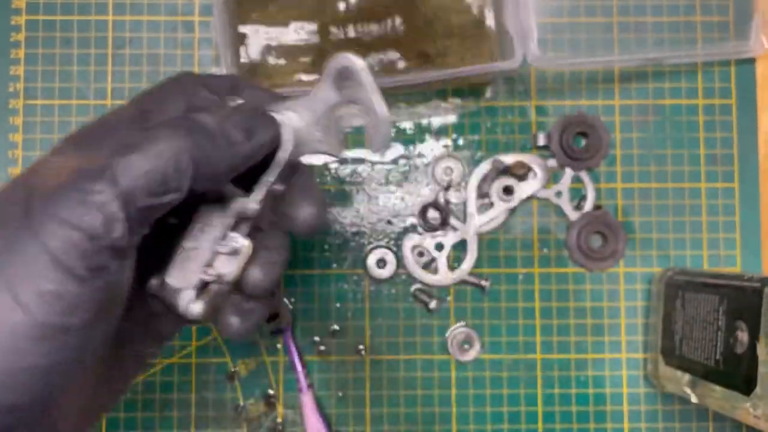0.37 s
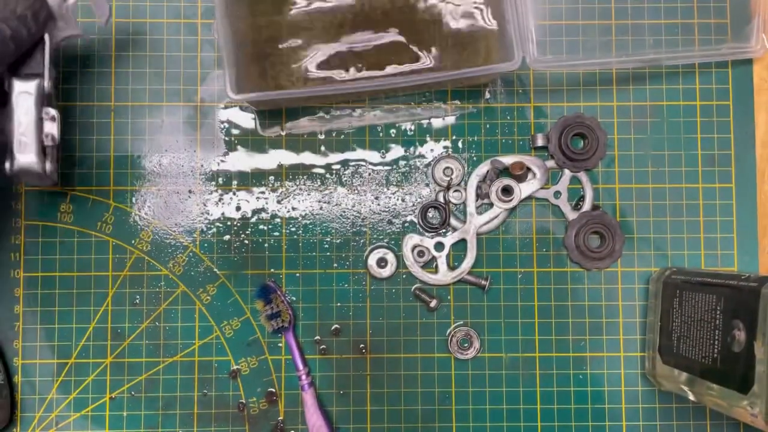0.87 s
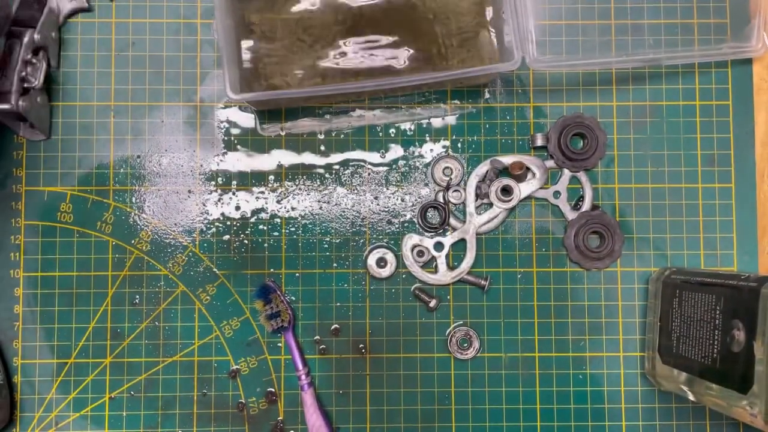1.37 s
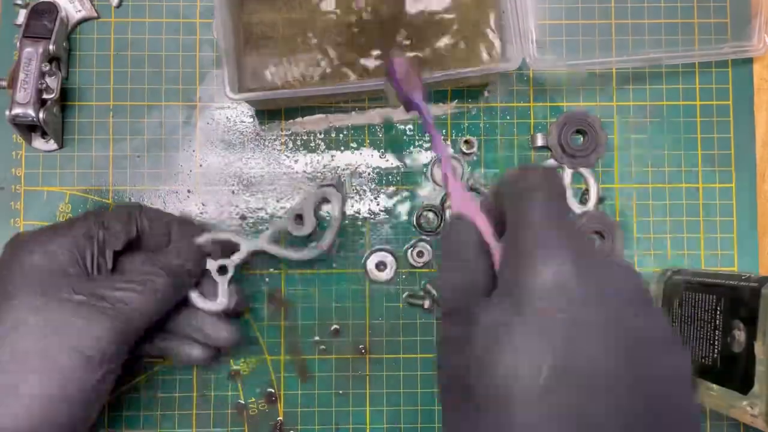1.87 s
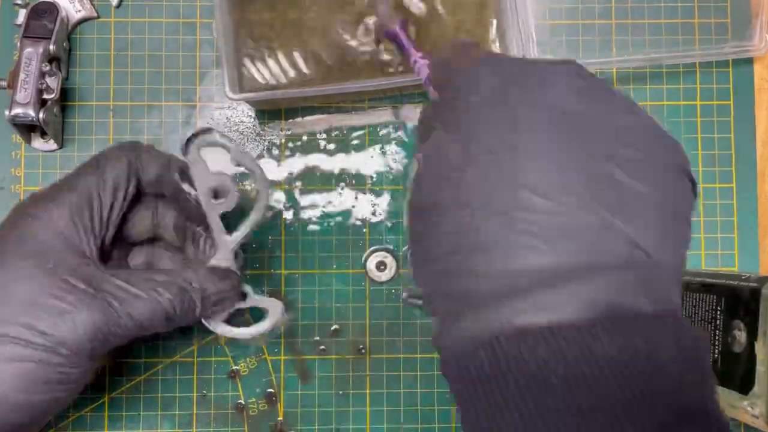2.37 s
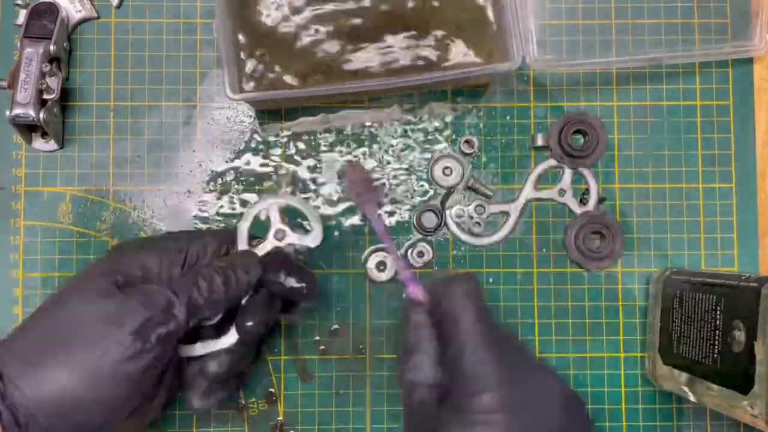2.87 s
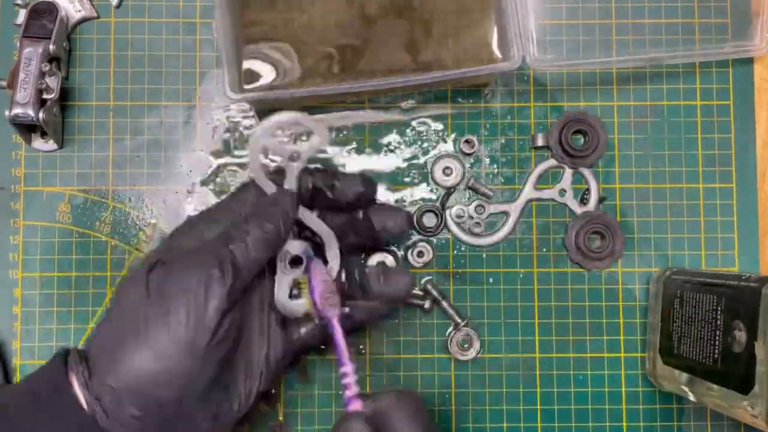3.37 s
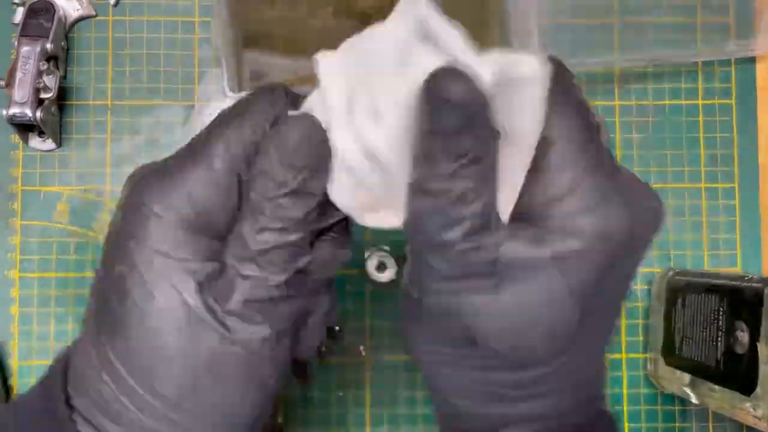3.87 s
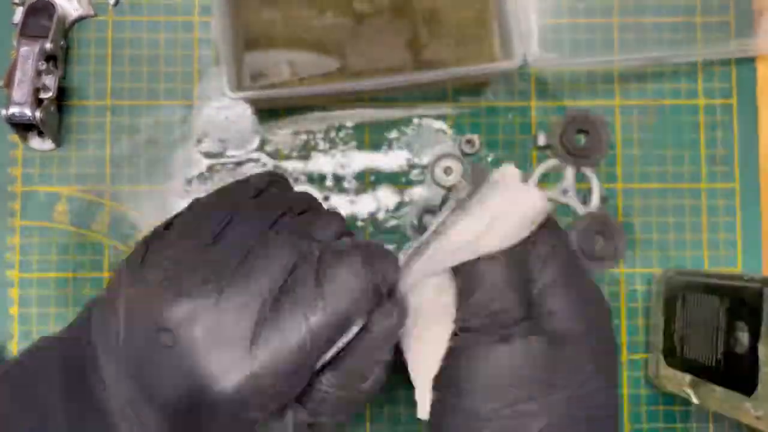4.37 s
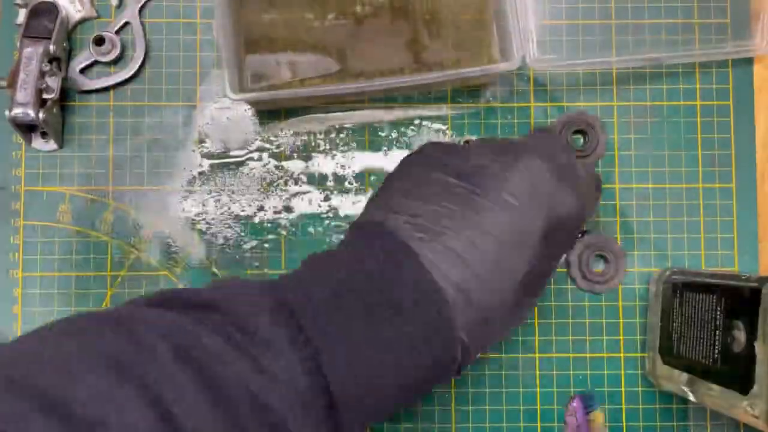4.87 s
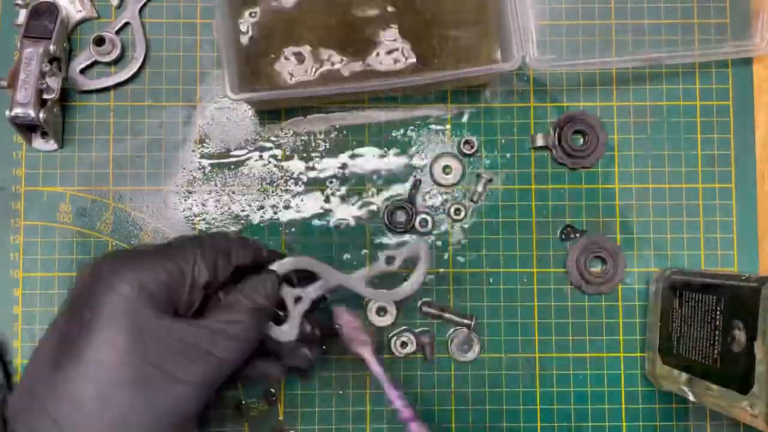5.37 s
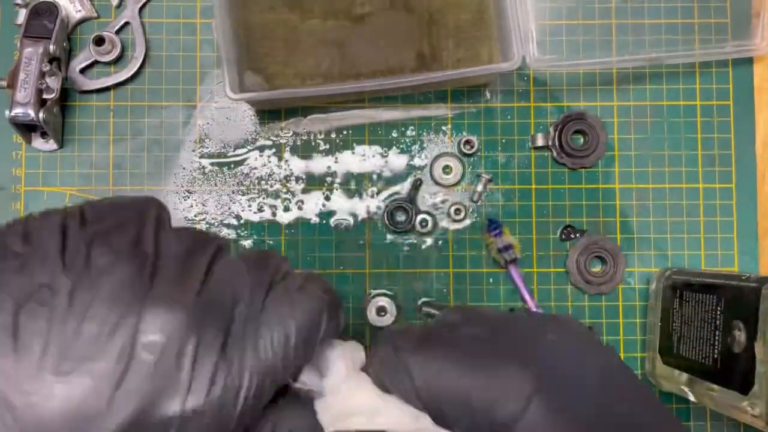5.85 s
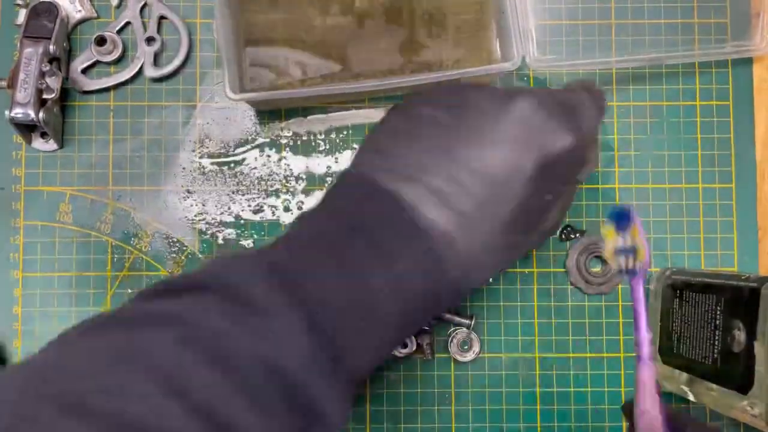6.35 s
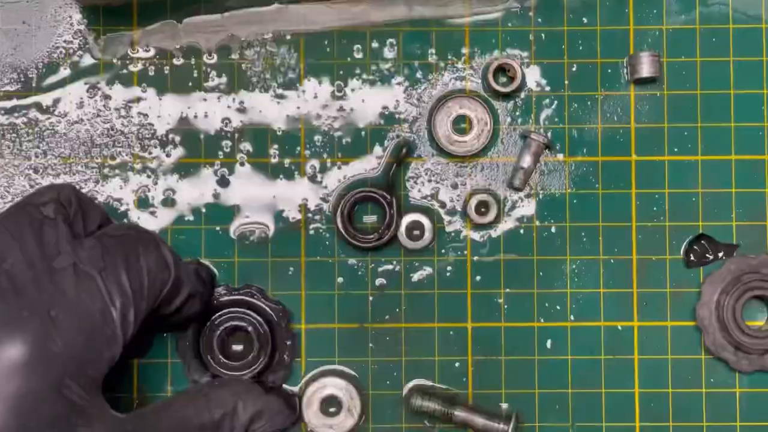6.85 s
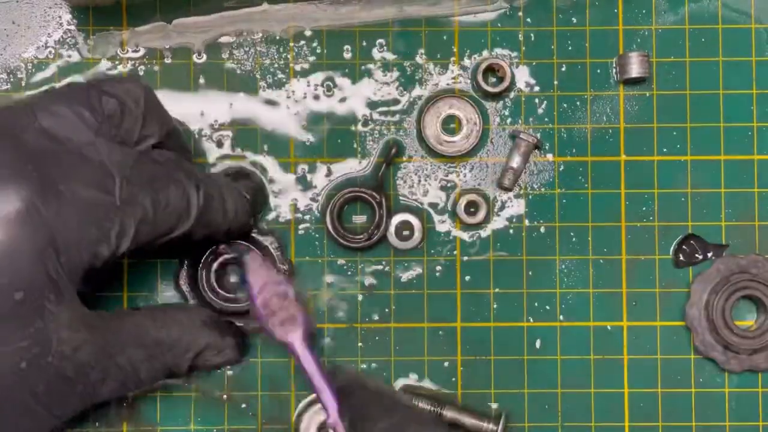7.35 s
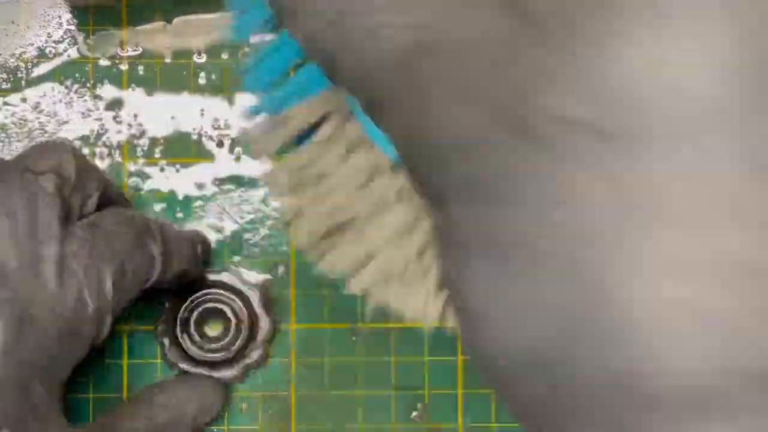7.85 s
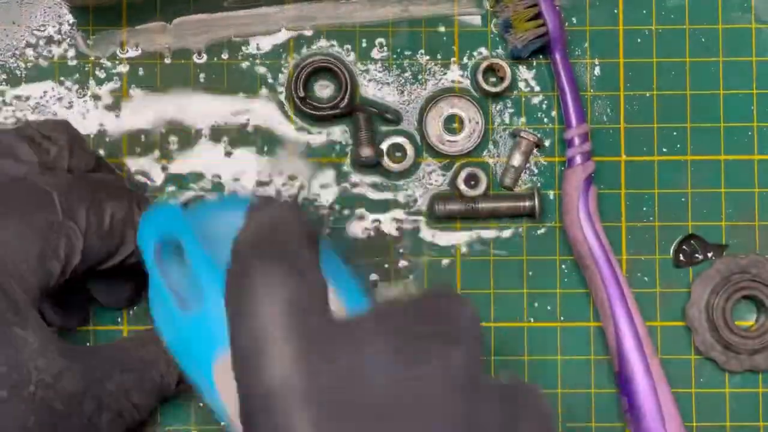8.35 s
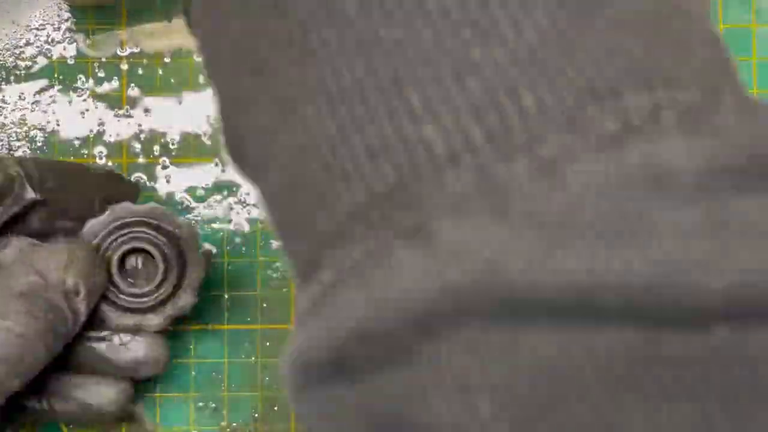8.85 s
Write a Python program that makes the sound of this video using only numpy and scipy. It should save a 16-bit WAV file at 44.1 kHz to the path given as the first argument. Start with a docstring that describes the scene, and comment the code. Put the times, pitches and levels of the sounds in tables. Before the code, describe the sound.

At natural speed, a squirt of liquid hisses sharply and stops, leaving low quiet rumble until a part knocks the bench several times. After a tiny silent gap, fast-motion cleaning follows: light brushing, soft cloth wiping, gritty ticks and hard small-part clicks, each knocking the bench woodenly. A faint engine note glides past about midway. Miked close, fairly dry, with thin airy room murmur and the strongest rasping last.

```python
"""Gloved hands clean small metal parts on a work bench; brush, cloth and scrubber strokes are lumpy noise.
First, at natural speed, a spray trigger clicks and its jet squirts sputtering hiss; then a part meets the
bench with clicks, thumps and a dull room wash. Then comes fast motion, high and short: strokes whose lumps
also shake the bench, ticks, and clacking parts made of noise snaps and ringing modes. Rumble fills the room,
as a murmur with a faint engine note and hum in fast motion; one short silent splice interrupts the sound."""
import sys
import numpy as np
from scipy import signal
from scipy.fft import rfft, irfft, next_fast_len
from scipy.io import wavfile
from scipy.ndimage import uniform_filter1d, map_coordinates

SR = 44100
rng = np.random.default_rng(int(sys.argv[2]) if len(sys.argv) > 2 else 0)


def generate_wav(signal):
    """Clip the signal to [-1, 1] and save it as 16-bit WAV at the path in sys.argv[1]."""
    frames = np.transpose(np.atleast_2d(signal))
    scaled = np.clip(frames, -1, 1) * 32767
    pcm = np.round(scaled).astype(np.int16)
    wavfile.write(sys.argv[1], SR, pcm)


def elevation(decibels):
    """Turn decibel levels (scalar or array-like) into linear amplitude ratios."""
    levels = np.asarray(decibels, float)
    return 10 ** (levels / 20)


N = 396018
TIME = np.arange(N) / SR
FAST = 8  # how many times faster the fast motion runs
FAST_START_S = 1.606
SPLICE_START_S, SPLICE_END_S = 1.897, 1.974


def unit(x):
    """Scale a sound to an rms of 1."""
    return x / np.sqrt(np.mean(x ** 2) + 1e-20)


def noise():
    """White noise for the whole scene."""
    return rng.standard_normal(N)


def along(points, hz):
    """Read a curve of (pitch [Hz], value) points, with pitch on a log scale."""
    point_hz, value = np.transpose(points)
    return np.interp(np.log(hz + 1), np.log(point_hz + 1), value)


def wobble(rate):
    """A smooth random curve with this many random points a second."""
    points = rng.standard_normal(int(N * rate / SR) + 4)
    return map_coordinates(points, [TIME * rate])


def coloured(x, spectrum):
    """Make each pitch louder or softer by a (pitch [Hz], level [dB]) curve."""
    size = next_fast_len(len(x) + 8192)
    gain = elevation(along(spectrum, np.fft.rfftfreq(size, 1 / SR)))
    return irfft(rfft(x, size) * gain, size)[:len(x)]


def patchy(x, depth_db):
    """Give a sound random louder and softer patches, about 1 kHz by 20 ms, at rms 1."""
    z = signal.stft(x, nperseg=256)[2]
    field = uniform_filter1d(rng.standard_normal(z.shape), size=6, axis=0)
    field = uniform_filter1d(field, size=7, axis=1)
    patched = signal.istft(z * elevation(depth_db * unit(field)), nperseg=256)[1]
    return unit(patched[:N])


def held(start, length, db, rise_s, fall_db_per_s, sag_db_per_s=0):
    """Gain of one gesture: a short rise, a hold that may sag, a fall at a steady dB rate."""
    t = TIME - start
    sag_db = sag_db_per_s * np.clip(t, 0, length)
    fall_db = fall_db_per_s * np.clip(t - length, 0, 1)
    return np.clip(t / max(rise_s, 1e-4), 0, 1) * elevation(db - sag_db - fall_db)


def ring(modes, speed, near_hz=None, focus_db=0):
    """One blow on a set of modes, peak 1; the spot struck favours the modes near one pitch."""
    t = np.arange(int(SR * .7 / speed)) / SR * speed
    hz, db, t60 = np.transpose(modes * 2)[:, :, None]
    hz = hz * (1 + .015 * rng.standard_normal(hz.shape))  # every mode is a close, beating pair
    db = db + rng.normal(0, 2.5, hz.shape)
    if near_hz:
        octaves_away = np.abs(np.log2(hz * speed / near_hz))
        db = db - np.minimum(focus_db * octaves_away, 18)
    # each mode needs about a cycle to swing up, so the thump seems to fall in pitch
    rise = 1 - np.exp(-t * hz / 0.73)
    phase = np.tile(rng.uniform(0, 2 * np.pi, (len(modes), 1)), (2, 1))
    swing = np.sin(2 * np.pi * hz * t + phase)
    x = (rise * elevation(db - 60 * t / t60) * swing).sum(0)
    return x / np.abs(x).max()


def crack(spectrum, t60):
    """A broadband snap of peak 1 with a short noisy tail."""
    t = np.arange(SR // 8) / SR
    snap = elevation(-60 * t / 0.0036)
    tail = 0.29 * elevation(-60 * t / max(t60, .005))
    x = rng.standard_normal(len(t)) * (snap + tail)
    x = coloured(np.pad(x, (32, 0)), spectrum)[32:]
    return x / np.abs(x).max()


def add(track, s, x):
    """Mix a sound into the track from time s."""
    part = track[round(s * SR):][:len(x)]
    part += x[:len(part)]


def stereo(x, width):
    """Two close ports: the side signal is the sound with phases that drift as the hands move."""
    z = signal.stft(x, nperseg=128)[2]
    drift = uniform_filter1d(rng.standard_normal((2, *z.shape)), size=60, axis=2)
    turn = (drift[0] + 1j * drift[1]) / np.hypot(*drift)
    side = signal.istft(z * turn, nperseg=128)[1][:N]
    side = coloured(side * np.std(x) / np.std(side), width)
    return np.array([x + side, x - side])


# tone colour of the quiet room: (pitch [Hz], relative level [dB])
SLOW_ROOM_TONE = [(20, -33), (45, -3), (65, 3.5), (85, -12.5), (165, -15), (300, -20), (500, -30),
                  (3500, -32), (8500, -44.5), (11000, -15), (16000, -39)]


def slow_room():
    """The quiet room at natural speed: steady noise, strongest in the low rumble."""
    return elevation(-80) * unit(coloured(noise(), SLOW_ROOM_TONE))


# tone colour of the room in fast motion: (pitch [Hz], relative level [dB])
FAST_ROOM_TONE = [(100, -49), (400, -10), (555, 3.5), (680, -0.5), (780, 0), (860, -10.5), (1100, -6),
                  (1350, -11), (2000, -19.5), (6000, -29), (16000, -65.5)]


def fast_room():
    """The room rumble lifted to a wavering mid-range murmur of air, quieter before the splice."""
    level_db = np.where(TIME < SPLICE_START_S, -61, -59) + 1.93 * wobble(20)
    return elevation(level_db) * unit(coloured(noise(), FAST_ROOM_TONE))


def tone(pitch_hz):
    """A pure tone of rms 1 that follows a changing pitch."""
    return np.sqrt(2) * np.sin(2 * np.pi * np.cumsum(pitch_hz) / SR)


def hum():
    """A thin hum in fast motion: one tone that wavers slightly in pitch and level."""
    return elevation(-82.5 + 2.9 * wobble(9.1)) * tone(1700 + 5 * wobble(18))


# path of a distant engine, raised by the fast motion: (time [s], pitch [Hz], level [dB])
ENGINE_PATH = [(4.3, 550, -69), (4.53, 578.3, -63), (4.68, 549, -53.5), (4.88, 494.9, -67.5),
               (5.05, 535, -54), (5.17, 589, -60.5), (5.35, 622, -65), (5.55, 635, -69)]


def engine():
    """A distant engine note: a tone gliding along its path, with small random wavering."""
    s, hz, db = np.transpose(ENGINE_PATH)
    pitch_hz = np.interp(TIME, s, hz) + 6 * wobble(25)
    level_db = np.interp(TIME, s, db) + 2.6 * wobble(22)
    return elevation(level_db) * tone(pitch_hz)


# heavy contacts that shove the whole bench: (time [s], level [dB])
BENCH_SHOVES = [(4.708, -65), (6.223, -58)]


def shoves():
    """Each heavy contact gives one smooth low push to the bench."""
    width_s = .0015
    return sum(elevation(db) * np.exp(-((TIME - s) / width_s) ** 2) for s, db in BENCH_SHOVES)


# washes of room sound around the set-down contacts: (start time [s], length [s], level [dB])
ROOM_WASHES = [(0.403, 0.34, -79), (1.076, .025, -61), (1.111, 0.0279, -61.5), (1.32, 0.0147, -66)]
# tone colour of the room wash: (pitch [Hz], relative level per Hz [dB])
ROOM_WASH_TONE = [(300, -16), (1200, -4.5), (3500, -1.5), (6500, -8), (9000, -21), (11500, -10),
                  (16000, -31)]


def room_wash():
    """The room's dull wash of patchy noise, dying away after each set-down contact it follows."""
    gains = [held(*row, rise_s=0.0092, fall_db_per_s=140) for row in ROOM_WASHES]
    return np.max(gains, axis=0) * patchy(coloured(noise(), ROOM_WASH_TONE), depth_db=3.0)


def spray_flow():
    """The squeezed trigger dribbles, the jet opens, weakens and shuts, and the room rings on."""
    squeeze_s, jet_s, jet_length_s = .031, 0.054, 0.098
    swell_db = 519.5 * np.clip(squeeze_s - TIME, 0, 1)
    dribble = elevation(-36.5 - swell_db) * (TIME < jet_s)
    jet = held(jet_s, jet_length_s, -24, rise_s=0.0023, fall_db_per_s=700, sag_db_per_s=69.5)
    tail = held(jet_s, jet_length_s, -41, rise_s=.004, fall_db_per_s=169.5)
    return np.max([dribble, jet, tail], axis=0)


# tone colour of the spray: (pitch [Hz], relative level per Hz [dB])
SPRAY_TONE = [(300, -21.5), (1000, -15), (1900, -4), (2700, -5), (3400, -3.5), (6500, -4.5), (9000, -11.5),
              (10000, -18.5), (12500, -22.5), (16000, -32.5)]


def spray():
    """A squirt of liquid: hiss whose level sputters, shaped by the flow."""
    sputter = elevation(1.0 * wobble(190) + 1.2 * wobble(45))
    return spray_flow() * patchy(sputter * coloured(noise(), SPRAY_TONE), depth_db=1.6)


# ways the bench rings at natural speed: (pitch [Hz], relative level [dB], time to fall 60 dB [s])
BENCH_MODES = [(68.5, 2, 0.6), (85.04, 4.5, 0.45), (110.6, 3.5, 0.25), (141.2, -6, 0.35), (156, 0.5, .28),
               (172.5, -4.5, 0.27), (186.5, 1, 0.22), (215.7, 0, 0.21), (243, -7, 0.21),
               (275.5, -4.5, 0.21), (320, -9.5, 0.13), (365.4, -9, 0.19), (429, -2.5, 0.2),
               (550, -15, 0.24)]
# natural-speed contacts, first the spray trigger, then the part on the bench:
# (time [s], relative click level [dB], thump level [dB], favoured thump pitch [Hz])
BENCH_AND_TRIGGER_CONTACTS = [(0.0319, -10, -40, 165), (0.4135, -49, -74, 67.7), (1.077, -35, -49.5, 185.3),
                              (1.1163, -29, -44, 147.2), (1.321, -35.5, -31.5, 235),
                              (1.3405, -48.5, -38, 117.5), (1.4449, -45, -42, 142.8)]
# tone colour of a click at natural speed: (pitch [Hz], relative level [dB])
CLICK_TONE = [(300, -17), (2000, 4.5), (5000, -4), (12000, -12)]


def bench_and_trigger_contacts():
    """The spray trigger, then the part on the bench: thumps from the bench modes, noise clicks just after."""
    x = np.zeros(N)
    for s, click_db, thump_db, thump_hz in BENCH_AND_TRIGGER_CONTACTS:
        add(x, s + 0.0017, elevation(click_db + 3.0) * crack(CLICK_TONE, t60=0.024))
        add(x, s, elevation(thump_db) * ring(BENCH_MODES, 1, thump_hz, focus_db=9.5))
    return x


# a thin steel plate, before lowering by 1 %:
# (pitch [Hz], relative level [dB], time to fall 60 dB [s])
PLATE_MODES = [(3620, -2.5, 0.066), (5570, -7, 0.044), (6971, 5, 0.015), (10640, 5, 0.025)]
# drops of the plate: (time [s], level [dB])
PLATE_FALLS = [(3.6078, -19.5)]


def plate():
    """A dropped thin plate rings clearer than the small parts."""
    x = np.zeros(N)
    for s, db in PLATE_FALLS:
        add(x, s, elevation(db) * ring(PLATE_MODES, 0.99))
    return x


# small steel parts as heard in fast motion:
# (pitch [Hz], relative level [dB], time to fall 60 dB [s])
STEEL_MODES = [(4836, -2.5, 0.02), (5940, -4, 0.0147), (11720, 3.5, 0.01)]
# fast-motion contacts:
# (time [s], relative click level [dB], relative knock level [dB], favoured knock pitch [Hz])
CLACK_CONTACTS = [(1.6698, -43.5, -33, 1204), (1.7502, -33, -58, 1900), (1.7592, -32, -59, 1368),
                  (1.7914, -24.5, -45.5, 1210), (1.8754, -37, -36.5, 883), (1.9736, -32.5, -49, 830),
                  (1.9956, -36.5, -40, 1510), (2.0576, -29, -45, 1450), (2.1724, -31, -42, 1700),
                  (2.1855, -53, -35.5, 1570), (2.3289, -26.5, -38.5, 1400), (3.6067, -12.5, -28, 1700),
                  (3.6279, -35, -46, 1270), (3.7362, -39.5, -47, 1160), (3.9378, -37, -46.5, 745),
                  (3.9708, -38.5, -47, 990), (4.386, -39.5, -65, 789), (4.6784, -29, -33.5, 1536),
                  (4.6885, -31, -37, 1660), (4.7076, -20, -28, 1390), (4.725, -33, -31.5, 1420),
                  (4.9686, -30.5, -60, 1430), (5.0447, -22, -27, 1480), (5.0829, -31.5, -43, 1660),
                  (5.1579, -18.5, -21, 1470), (5.294, -27.5, -32, 940), (5.4264, -27.5, -38, 1460),
                  (5.4449, -20.5, -19, 1580), (5.596, -36.5, -41.5, 1110), (6.0357, -47, -26.5, 1480),
                  (6.0438, -51, -28.5, 1430), (6.117, -39, -45.5, 794), (6.2122, -23.5, -30.5, 1540),
                  (6.2232, -18.5, -34, 1730), (6.2343, -27.5, -32.5, 740), (6.4272, -53, -38.5, 1200),
                  (6.448, -34, -39, 1495), (6.5647, -45, -39.5, 893), (7.1266, -37, -35.5, 1110),
                  (7.25, -23, -43, 840), (7.2722, -43, -44, 1700), (7.429, -31.5, -43, 1500),
                  (7.638, -34, -43, 1450), (7.6499, -15, -25, 1693), (7.8441, -35.5, -36, 940),
                  (7.9405, -47, -34.5, 860), (8.2766, -19, -18, 1500), (8.5138, -41.5, -40.5, 870),
                  (8.819, -24, -33, 1100), (8.881, -38.5, -34, 1200), (8.9231, -38, -38, 1520),
                  (8.9343, -33, -35.5, 1530), (8.956, -15.5, -21.5, 920)]
# tone colour of a snap in fast motion: (pitch [Hz], relative level [dB])
SNAP_TONE = [(600, -23), (1500, 6), (5000, -1.5), (10000, -6.5), (16000, -2.5)]


def clacks():
    """Each contact snaps, rings the steel a little, knocks the bench and bounces once."""
    x = np.zeros(N)
    for s, click_db, knock_db, knock_hz in CLACK_CONTACTS:
        knock = ring(BENCH_MODES[1:], FAST, knock_hz, focus_db=39.5)
        steel = ring(STEEL_MODES, 1)
        # the first blow, then the softer bounce
        for late, loss_db in [(.0008, 0), (rng.uniform(0.0044, .007), -10)]:
            add(x, s + late, elevation(click_db + loss_db + 2.0) * crack(SNAP_TONE, t60=0.029))
            add(x, s + late, elevation(click_db + loss_db - 12.5) * steel)
            add(x, s + late, elevation(knock_db + loss_db + 2.5) * knock)
    return x


# tone colour of bristles and grit: (pitch [Hz], relative level per Hz [dB])
BRISTLE_TONE = [(900, -24), (2000, -7), (3000, -7.5), (4500, -8.5), (6500, -7), (8500, -8), (12000, -6),
                (16000, -6.5)]


def ticks(hiss):
    """Small random ticks of wet gloves and grit, sized by the stroke under way up to a limit."""
    x = np.zeros(N)
    for where, size in rng.uniform(size=(330, 2)):
        s = FAST_START_S + where * (N / SR - FAST_START_S)
        # the limit lets firm scrubbing drown the ticks
        stroke = min(hiss[int(s * SR)], elevation(-56.5))
        add(x, s, stroke * elevation(7.5 - 3.46 * np.log(1 - size)) * crack(BRISTLE_TONE, t60=0.017))
    return x


# strokes in fast motion:
# (start time [s], length [s], bristle hiss level [dB], bench drone level over the hiss [dB])
STROKE_MOVES = [(1.664, 0.037, -82, 16), (1.717, 0.062, -47.5, -6), (1.823, 0.026, -59.5, -6),
                (1.87, .03, -68, 10.5), (1.983, 0.16, -54, 6.5), (2.134, 0.1, -65, 5.5),
                (2.249, 0.11, -52, -5), (2.35, 0.32, -68.5, 0), (2.712, 0.12, -65.5, -2),
                (2.922, 0.22, -63.5, -5), (3.202, 0.24, -61.5, -11), (3.446, 0.49, -68, 0),
                (3.97, 0.24, -64.5, -2), (4.381, 0.12, -63.5, -10), (4.587, 0.085, -66, -4),
                (4.681, 0.05, -54, 7.5), (4.837, 0.053, -48, 0.5), (4.906, 0.078, -51.5, -1),
                (4.996, 0.147, -59, 3.5), (5.316, 0.43, -63, -5), (5.57, 0.54, -67.5, 2.5),
                (6.215, 0.026, -50.5, 9), (6.245, .05, -61.5, 2), (6.292, 0.036, -54.5, -3.5),
                (6.368, 0.099, -60.5, -2.5), (6.491, 0.27, -55.5, 0), (6.936, 0.028, -50.5, -1.5),
                (6.967, 0.12, -66, 3.5), (7.066, 0.201, -52.5, -1.5), (7.28, 0.089, -67.5, 3.5),
                (7.365, .35, -54, -2), (7.809, 0.12, -64, 6.5), (7.938, 0.27, -43, 2),
                (8.011, .13, -41.5, 3), (8.208, 0.13, -62.5, 6), (8.276, 0.032, -41.5, 0.5),
                (8.34, 0.099, -40, -3), (8.442, 0.11, -60, -8.5), (8.513, 0.16, -52.5, -21),
                (8.821, 0.021, -67, 11.5), (8.844, 0.043, -53, 1), (8.921, 0.014, -48, -16),
                (8.955, 0.032, -42, 4.5)]


def stroke_gains():
    """Bristle and bench gains: the strongest stroke under way, else idle hands."""
    hiss, drone = np.full(N, elevation(-78)), np.full(N, elevation(-73.5))
    for start, length, db, bench_db in STROKE_MOVES:
        gain = held(start, length, db, rise_s=0.0046, fall_db_per_s=2498)
        hiss = np.maximum(hiss, gain)
        drone = np.maximum(drone, elevation(bench_db) * gain)
    return hiss, drone


def bench_response(f):
    """How strongly the bench answers steady shaking at each pitch: a sum of resonances."""
    total = 0
    for k, (hz, db, t60) in enumerate(BENCH_MODES[1:]):
        resonance = 1j * f / (hz ** 2 - f ** 2 + 2.2j * f / t60)
        total = total + (-1) ** k * elevation(db) / t60 * resonance
    return total


def strokes(hiss, drone):
    """Bristles catch in lumps; the same lumps shake the bench into a drone."""
    lumps = elevation(0.67 * wobble(35) + 2.2 * wobble(110) + 2.86 * wobble(400))
    # light wiping comes and goes more than firm scrubbing
    fit_depth_db = np.where(hiss < elevation(-60), 4.4, 1.1)
    fits = elevation(fit_depth_db * wobble(75) + 0.82 * wobble(12))
    bristles = patchy(lumps * coloured(noise(), BRISTLE_TONE), depth_db=3.0)
    # dividing the pitches by FAST raises the bench by that factor
    response = bench_response(np.fft.rfftfreq(N, FAST / SR))
    shake = irfft(rfft(lumps * noise()) * response, N)
    return fits * hiss * bristles + drone * unit(shake)


def natural_speed():
    """The trigger and squirt, then the part on the bench with the room's wash, in the quiet room."""
    return slow_room() + room_wash() + spray() + bench_and_trigger_contacts()


def fast_motion():
    """Hands and parts above a raised low cut, plus bench shoves and the fast room."""
    hiss, drone = stroke_gains()
    # the microphone's low cut of 81.7 Hz is lifted by the fast motion too
    cut = signal.butter(2, 81.7 * FAST, "high", fs=SR, output="sos")
    work = signal.sosfilt(cut, strokes(hiss, drone) + ticks(hiss) + clacks() + plate())
    return work + shoves() + fast_room() + engine() + hum()


# stereo width at natural speed: (pitch [Hz], side level against the middle [dB])
SLOW_WIDTH = [(60, -32), (180, -19), (550, -4.5), (1650, -4), (4970, -0.5), (15000, 2)]
# stereo width in fast motion: (pitch [Hz], side level against the middle [dB])
FAST_WIDTH = [(60, -24), (240, -28.5), (950, -23), (3770, -6.5), (15000, -6.5)]


def scene():
    """Natural speed, a quick fade over to fast motion, and a short silent splice."""
    fade = np.clip((TIME - FAST_START_S) / 0.039, 0, 1)
    slow = stereo(natural_speed() * (1 - fade), SLOW_WIDTH)
    fast = stereo(fast_motion() * fade, FAST_WIDTH)
    balance = elevation([[.5], [-.5]])  # fast motion leans slightly to the first channel
    outside_splice_s = np.maximum(SPLICE_START_S - TIME, TIME - SPLICE_END_S)
    sounding = np.clip(outside_splice_s / 0.0047, 0, 1)
    return (slow + fast * balance) * sounding


def roll_off(x):
    """The treble ends steeply here."""
    return signal.sosfilt(signal.butter(12, 17080, fs=SR, output="sos"), x)


def record(dry):
    """Cut the highest treble of each channel, then finish the mix."""
    top_hz = 15930
    band_limit = [(top_hz, 0), (top_hz + 150, -35), (17500, -60)]
    mix = np.array([coloured(channel, band_limit) for channel in dry])
    return roll_off(mix)


dry = scene()
out = record(dry)
generate_wav(out)
```